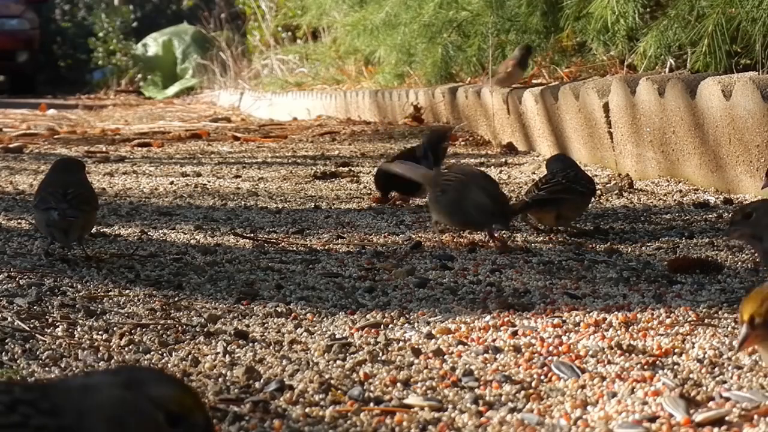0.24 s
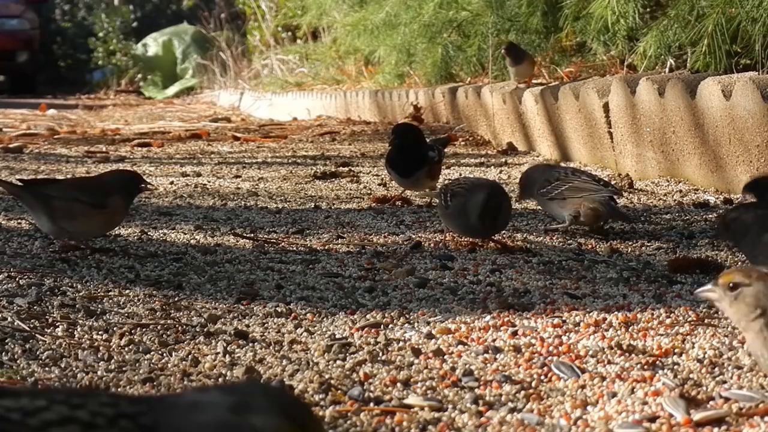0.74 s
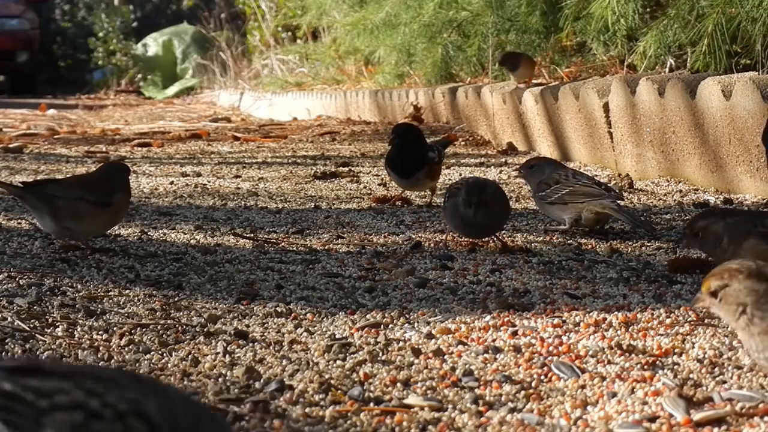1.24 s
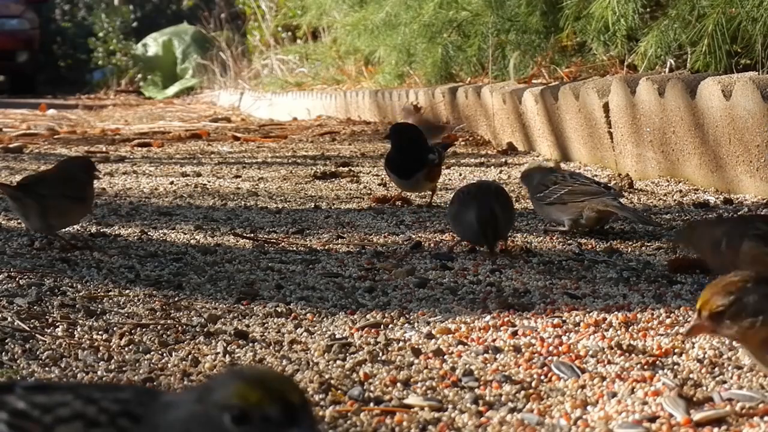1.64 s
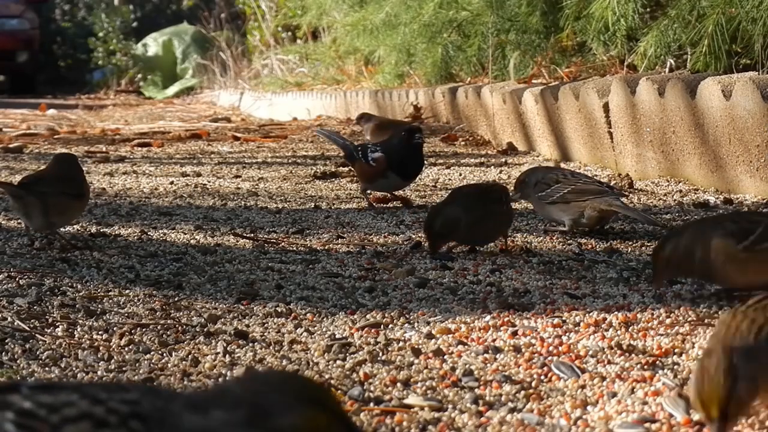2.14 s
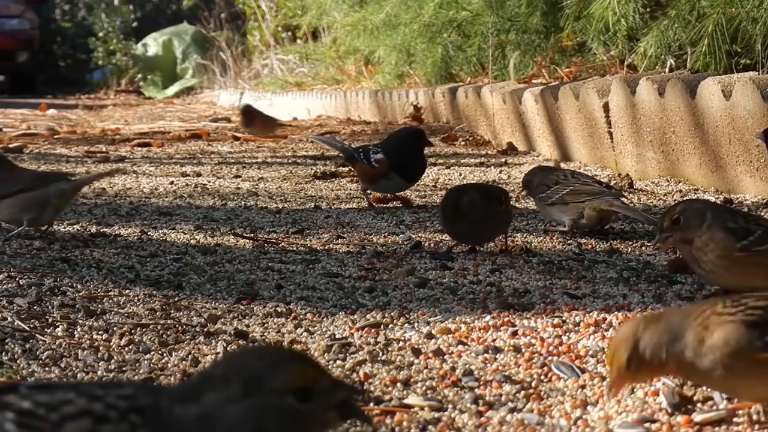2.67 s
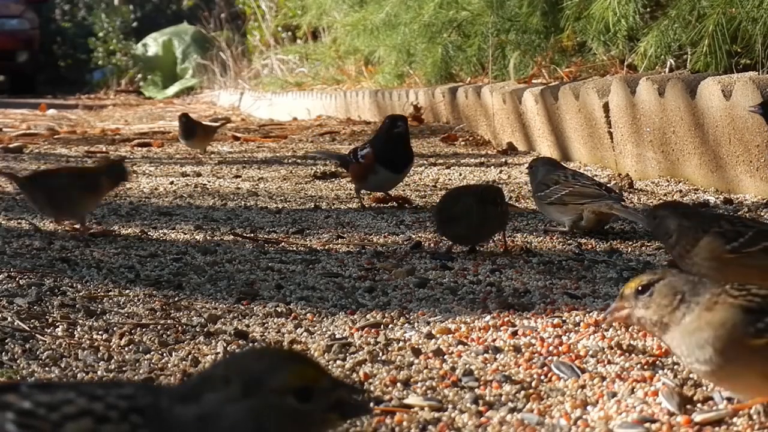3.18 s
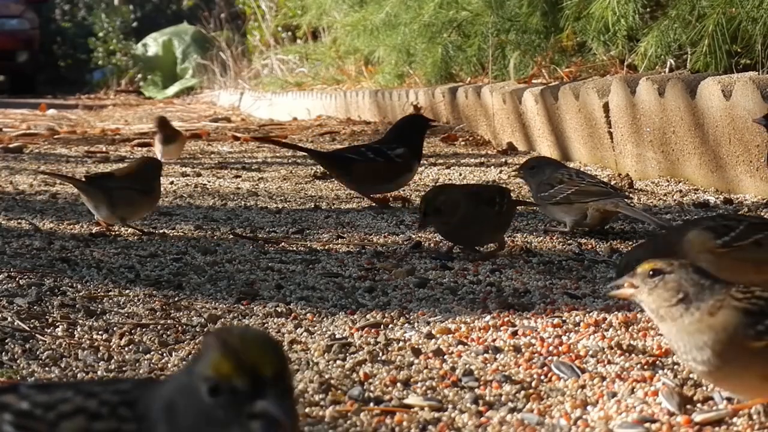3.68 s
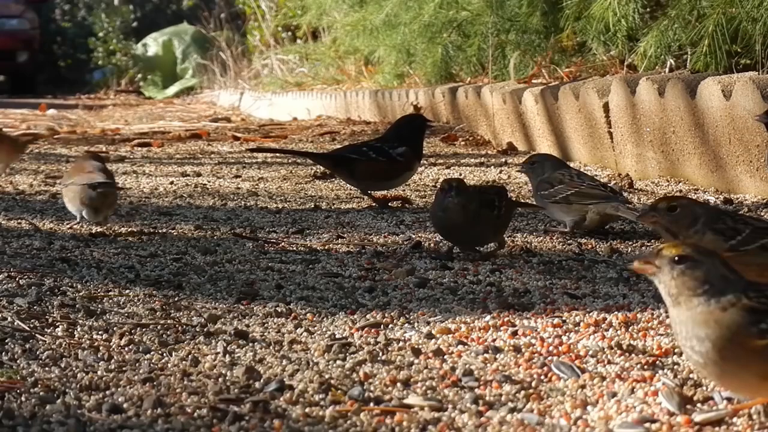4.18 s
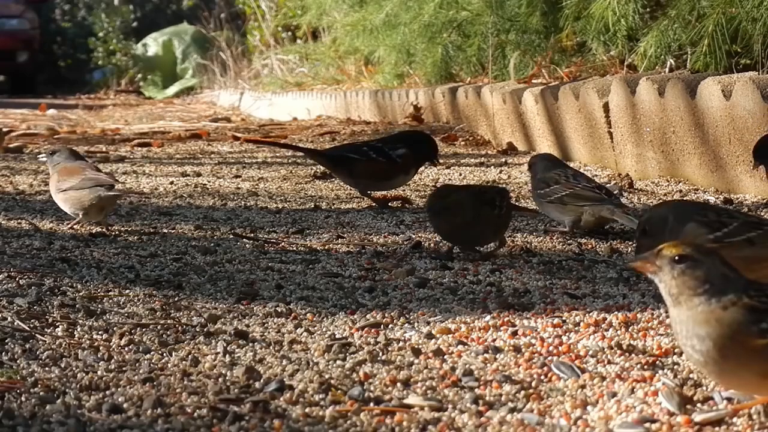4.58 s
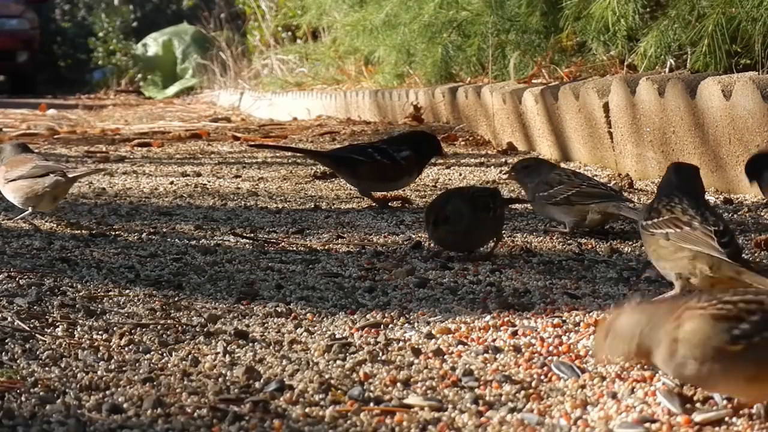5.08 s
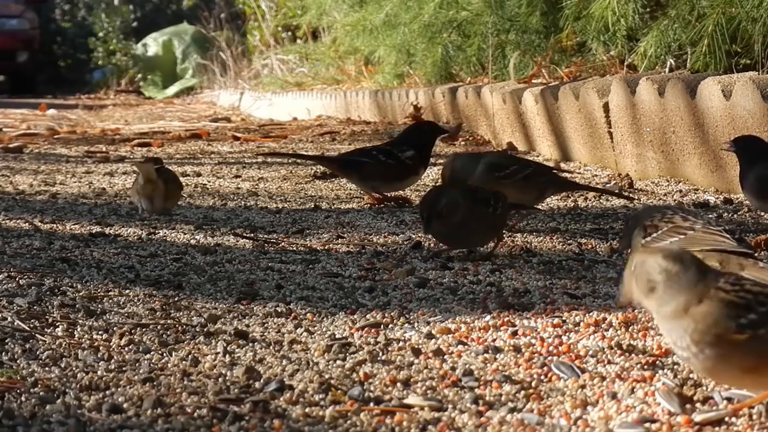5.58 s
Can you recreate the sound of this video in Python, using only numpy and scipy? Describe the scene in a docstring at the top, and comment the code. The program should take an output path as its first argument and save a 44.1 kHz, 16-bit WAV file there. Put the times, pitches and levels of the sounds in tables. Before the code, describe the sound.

Thin, high bird notes fall in quick succession over a quiet outdoor hiss, while nearby small birds tap and crack seeds on gritty ground. The dry little clicks come unevenly, with occasional short chirps and a faint rustle of feet. Past the middle, a cluster of pecks, gravel scuffs and a short flutter stands out as far traffic rises. Everything sounds light and thin, without bass.

```python
"""Sharp little taps and cracks: sparrows feed on seed strewn over gravel, and one flutters briefly.
Each bill impact excites damped modes, a stony click and the snap of a husk, while feet stir the grit.
Thin chirps and a run of falling notes, all frequency-modulated tones, echo in the garden around them,
over a soft hiss and far traffic that swells. The recorder cuts the bass and adds a faint high whine."""
import sys
import numpy as np
from scipy import signal
from scipy.fft import rfft, irfft, next_fast_len
from scipy.io import wavfile
from scipy.ndimage import map_coordinates

SR = 44100
rng = np.random.default_rng(int(sys.argv[2]) if len(sys.argv) > 2 else 0)


def transcribe(u):
    """Save the signal u as a 16-bit wav file named by the first command-line argument.

    u: samples, shape (n,) or (channels, n), limited to [-1, 1]; the rate is SR.
    q: integer samples, one column per channel.
    """
    v = np.clip(np.atleast_2d(u).T, -1, 1)
    q = np.round(v * 32767).astype(np.int16)
    wavfile.write(sys.argv[1], SR, q)


N = 256662
TIME = np.arange(N) / SR

# spectrum of bill on stone: (ratio to click pitch [1], spectral level [dB])
CLICK_SPECTRUM = [(0.402, -26), (.75, -10.5), (1, -2), (1.251, -13), (1.8, -24)]
# spectrum of a cracking husk: (frequency [Hz], spectral level [dB])
HUSK_SPECTRUM = [(3500, -40), (6000, -26), (9000, -10), (10500, -3), (12200, -9), (13300, -2), (14300, 3),
                 (15200, -3), (16000, -12)]
# bill impacts, levels relative within each column: (time [s], knock level [dB], knock pitch [Hz],
# knock decay time T60 [s], click level [dB], click pitch [Hz], husk level [dB])
PECKS = [(0.4105, -41, 3250, .006, -56, 6300, -52), (0.566, -49.5, 2500, 0.0054, -54.5, 6660, -48.5),
         (.582, -51, 2990, 0.0054, -48.5, 5950, -43.5), (0.6458, -30.5, 2500, 0.0061, -49.5, 5570, -31.5),
         (0.6586, -43, 2410, 0.0066, -49.5, 6530, -47), (1.3343, -53, 2580, 0.0074, -53, 6000, -46),
         (1.3399, -51, 2580, 0.0077, -39, 5100, -43.5), (1.4079, -37, 2450, 0.0087, -55, 4800, -49.5),
         (1.4698, -41, 2800, 0.0042, -49, 4600, -47.5), (1.63, -57, 2400, .006, -51.5, 6800, -43),
         (1.9758, -33, 2910, 0.0016, -55.5, 7800, -49), (2.3063, -61, 2500, .005, -60.5, 6600, -55),
         (2.4654, -36.5, 2710, 0.0083, -61, 6600, -41.5), (2.487, -60, 2700, 0.0065, -55, 6750, -57),
         (2.9114, -51, 2600, .004, -55, 6000, -63), (3.208, -49.5, 2500, .005, -54, 6800, -58),
         (3.251, -47.5, 3100, .005, -61, 6000, -63), (3.2818, -39, 2140, .004, -58, 6560, -50),
         (3.3327, -50, 2600, .007, -55.5, 6000, -52.5), (3.404, -37.5, 2640, 0.0046, -47.5, 6900, -51),
         (3.691, -55, 2020, .0058, -52.5, 6600, -46), (3.8242, -29, 2700, 0.0063, -38.5, 6760, -35),
         (3.8459, -42, 2440, 0.0049, -56, 6600, -52), (3.9488, -48, 2560, 0.0051, -53, 6600, -40),
         (3.9719, -44, 2580, 0.0069, -46.5, 5800, -48.5), (4.1106, -45, 2280, .006, -51, 6600, -44),
         (4.132, -49, 2670, .006, -42, 6630, -34.5), (4.2065, -51, 2280, 0.0045, -49, 7840, -48.5),
         (4.228, -53, 2540, 0.0053, -46.5, 5200, -40), (4.2344, -60, 2600, .005, -46.5, 6000, -40.5),
         (4.2424, -57, 2600, .005, -49, 5200, -43), (4.252, -55, 2500, .005, -54, 6000, -41.5),
         (4.291, -47, 1990, 0.01, -48, 5970, -47.5), (4.3477, -54, 2450, .006, -62, 6600, -48.5),
         (4.363, -56, 2500, .006, -55.5, 6200, -46.5), (4.384, -52, 2500, .006, -54, 5600, -47.5),
         (4.424, -59, 2480, .006, -56, 6600, -49), (5.7224, -46, 2050, .008, -38, 8400, -43.5)]
def pecks():
    """Impact and fracture radiate brief transients: a woody knock, a stony click and a husk's crack."""
    out = np.zeros((2, N))
    lead_s, rebound_s = .003, .0015
    t = np.arange(SR // 40) / SR - lead_s
    for s, knock_db, knock_hz, t60, click_db, click_hz, husk_db in PECKS:
        click_spectrum = [(ratio * click_hz, db) for ratio, db in CLICK_SPECTRUM]
        click = amp(click_db - 9) * snap(click_spectrum, t, t60=.009)
        husk = amp(husk_db - 6.5) * snap(HUSK_SPECTRUM, t, t60=.0052)
        wood = panned(amp(knock_db - 11) * knock(knock_hz, t60, t), pan_db=1.5)
        add(out, s - lead_s, wood + panned(click + husk, pan_db=-3.5))
        add(out, s - lead_s + rebound_s, amp(-20.5) * wood)  # the seed hops and lands again
    return out

# modes of a knock: (ratio to knock pitch [1], relative level [dB])
KNOCK_MODES = [(.74, -5.5), (0.901, -2), (1.051, 2), (1.26, -2)]
# passband of a knock: (ratio to knock pitch [1], gain [dB])
KNOCK_BAND = [(.42, -32), (.56, -14), (.68, 0), (1.2, 0), (1.4, -8), (1.65, -26), (2.2, -50)]
def knock(hz, t60, t):
    """Damped free vibration: a few modes ring down over a little crunch from the seed bed."""
    age = np.maximum(t, 0)
    modes = sum(amp(db + rng.standard_normal()) * np.sin(2 * np.pi * hz * ratio * age)
                for ratio, db in KNOCK_MODES)
    envelope = (1 - np.exp(-age / .0003)) * amp(-60 * age / t60)
    band = [(ratio * hz, db) for ratio, db in KNOCK_BAND]
    crunch = amp(-18) * snap(band, t, t60=.014)
    return unit(shaped(modes * envelope, band)) + crunch

# spectrum of swept gravel: (frequency [Hz], spectral level [dB])
GRAVEL_SPECTRUM = [(600, -13.5), (1700, -13), (3500, -3.5), (4700, -4), (6500, -3), (8500, -13),
                   (9600, -4.5), (10700, 0.5), (11900, -4), (13200, -0.5), (14600, -2.5), (16000, -11)]
# foot sweeps: (peak time [s], rise [s], fall [s], level [dB])
SCUFFS = [(.568, 0.017, .018, -50), (1.344, 0.021, 0.049, -53.5), (3.95, .024, 0.075, -52),
          (4.116, .015, .011, -38.5), (4.131, .009, .016, -37), (4.172, 0.025, 0.057, -46),
          (4.24, 0.015, 0.03, -46.5), (4.36, 0.077, 0.12, -56), (5.218, 0.031, 0.07, -56.5),
          (5.379, 0.033, .027, -55)]
def scuffs(roughness):
    """Friction noise: each sweep of a foot stirs up a dense, uneven rattle of grit."""
    return roughness * strokes(SCUFFS) * noise(GRAVEL_SPECTRUM)

# spectrum of a wing's swish: (frequency [Hz], spectral level [dB])
WING_SPECTRUM = [(1000, -18), (1500, -4), (2000, 1.5), (3300, 1), (4000, -3), (4800, -1.5), (6600, 0),
                 (8500, -17), (16000, -31.5)]
# wing strokes: (peak time [s], rise [s], fall [s], level [dB])
WINGBEATS = [(4.117, 0.0057, 0.021, -44.5), (4.234, 0.011, 0.01, -56)]
def wingbeats(roughness):
    """Amplitude-modulated noise: each wing stroke is a short, full swish."""
    return roughness * strokes(WINGBEATS) * noise(WING_SPECTRUM)

# falling notes: (time [s], duration [s], first pitch [Hz], last pitch [Hz], relative level [dB])
FALLS = [(.003, .045, 5860, 3950, -55), (.138, 0.047, 6230, 3480, -51.5), (.281, 0.028, 6030, 3660, -49.5),
         (.404, .024, 6160, 4050, -51), (.519, .033, 5920, 3990, -54), (.625, 0.053, 6260, 3670, -52.5),
         (3.85, 0.042, 5770, 4220, -54.5)]
def falling_notes():
    """Frequency sweep: each note slides down an almost straight line."""
    def contour(u, length, first_hz, last_hz):
        return first_hz + (last_hz - first_hz) * u ** .95
    return whistles(FALLS, contour, depth_hz=50, jitter=.014, flutter_db=2.5)

# held notes: (time [s], duration [s], pitch [Hz], initial pitch offset [Hz], relative level [dB])
HOLDS = [(.259, 0.03, 5820, 98, -55.5), (.365, 0.048, 5790, 1450.5, -55), (.487, 0.036, 6050, 1201, -57.5),
         (.589, .045, 6550, -2.5, -56.5), (3.046, 0.011, 6380, 0.5, -54.5), (3.83, 0.023, 5970, 501.5, -60),
         (3.972, 0.027, 5850, 300, -57.5)]
def held_notes(settle_s=.014):
    """Exponential relaxation: each note settles onto its pitch, and most lead into a fall."""
    def contour(u, length, hz, offset_hz):
        return hz + offset_hz * np.exp(-u * length / settle_s)
    return whistles(HOLDS, contour, depth_hz=40, jitter=.012, flutter_db=3)

# chirps: (time [s], duration [s], top pitch [Hz], relative level [dB])
CHIRPS = [(.231, 0.029, 7350, -56.5), (.55, .032, 7260, -54), (.902, 0.03, 7280, -57),
          (1.094, 0.049, 7810, -48.5), (2.025, 0.028, 8120, -60), (2.702, .021, 7320, -62.5),
          (4.48, 0.071, 7140, -63), (4.752, 0.031, 6580, -61)]
def arched_chirps(peak=.76):
    """Reversing frequency sweep: the pitch climbs, rounds off late in the note and hooks down."""
    def contour(u, length, top_hz):
        climb = .18 * np.abs(1 - u / peak) ** 1.9
        hook = .093 * np.abs((u - peak) / (1 - peak)) ** 3
        return top_hz * (1 - np.where(u < peak, climb, hook))
    return whistles(CHIRPS, contour, depth_hz=20, jitter=.006, flutter_db=1)

# a thin buzzy call: (time [s], duration [s], pitch [Hz], relative level [dB])
BUZZES = [(4.712, 0.07, 9480, -55)]
def buzzy_call():
    """Deep, fast frequency modulation spreads a tone into sidebands, heard as a buzz."""
    return whistles(BUZZES, lambda u, length, hz: hz,
                    depth_hz=620, jitter=.045, flutter_db=2, vibrato_hz=201)

def whistles(notes, contour, depth_hz, jitter, flutter_db, vibrato_hz=180):
    """Frequency and amplitude modulation: each note is one sine, roughened in pitch and level."""
    out = np.zeros(N)
    waver = 1 + jitter * wobble(500)
    for s, length, *pitch, db in notes:
        u = np.linspace(0, 1, int(length * SR))  # progress through the note
        vibrato = depth_hz * np.sin(2 * np.pi * vibrato_hz * length * u)
        hz = contour(u, length, *pitch) * waver[int(s * SR):][:len(u)] + vibrato
        envelope = amp(db + 7.5) * np.abs(np.sin(np.pi * u ** 1.8)) ** .27
        add(out, s, envelope * np.sin(2 * np.pi * np.cumsum(hz) / SR))
    return out * unit(amp(flutter_db * wobble(260)))

def grit_ticks(per_second=70, ring_cycles=14):
    """Random impacts: grains knocked by feet ring as damped sines, each with its own pitch and place."""
    out, t = np.zeros((2, N)), np.arange(SR // 200) / SR
    for when, pitch, size, side in rng.random((int(per_second * N / SR), 4)):
        hz = 7500 * 2 ** (1.8 * (pitch - .5))
        envelope = amp(-56 + 12 * size ** 4 - 60 * t * hz / ring_cycles)
        ring = envelope * np.sin(2 * np.pi * hz * t)
        add(out, when * N / SR, panned(ring, pan_db=10 * (side - .5)))
    return out

# spectrum of the flock's rustle: (frequency [Hz], spectral level [dB])
RUSTLE_SPECTRUM = [(7000, -25), (9500, -10.5), (10800, -2), (12300, -8.5), (13600, -5.5), (16000, -9.5)]
# spells of busier shuffling: (peak time [s], half width [s], level rise [dB])
SPELLS = [(.97, 0.074, 2), (2.079, .2, 5), (3.0, 0.13, 4), (4.22, .17, 5.5), (5.05, 0.33, 5.5)]
def rustle():
    """Incoherent superposition: the flock's small steps and nibbles merge into a thin, grainy noise."""
    busy_db = sum(rise_db * np.exp(-((TIME - s) / width) ** 2) for s, width, rise_db in SPELLS)
    grains = unit(amp(2.5 * wobble(900) + 2 * wobble(25)))
    return panned(amp(-65.5 + busy_db) * grains * noise(RUSTLE_SPECTRUM), pan_db=-1)

# spectrum of far traffic: (frequency [Hz], spectral level [dB])
TRAFFIC_SPECTRUM = [(500, -7.5), (1000, -1.5), (1300, -4), (1850, 1.5), (2400, -2.5), (3300, -14.5),
                    (4200, -19), (6000, -38.5)]
def traffic(far_db=-64, near_db=-50.5, midpoint_s=3.9, approach_s=.55):
    """Level rises as distance shrinks: traffic noise swells once as it draws nearer."""
    nearness = (1 + np.tanh((TIME - midpoint_s) / approach_s)) / 2
    db = far_db + (near_db - far_db) * nearness
    return amp(db + .7 * wobble(10)) * noise(TRAFFIC_SPECTRUM)

# spectrum of the outdoor hiss: (frequency [Hz], spectral level [dB])
HISS_SPECTRUM = [(500, -6), (1000, 1), (1300, -5.5), (1900, 1.5), (2400, -3), (3600, -4), (4200, -6.5),
                 (6400, -9), (8500, -12), (10900, -16), (12400, -16), (14000, -18), (16000, -19)]
def hiss():
    """Ambient noise floor: a broadband hiss whose level barely drifts."""
    return amp(-53.5 + .35 * wobble(1.4)) * noise(HISS_SPECTRUM)

# balance of the background: (frequency [Hz], left minus right level [dB])
BALANCE = [(1300, 2.5), (2400, 1.5), (4400, 1.5), (8000, 0), (14000, -2)]
def background():
    """Interchannel level difference: hiss and traffic lean left, their highest treble right."""
    return filtered(hiss() + traffic(), lambda hz: amp(along(BALANCE, hz) * [[.5], [-.5]]))

def garden(x, t60):
    """Diffuse reverberation: echoes from ground, edging and shrubs decay exponentially."""
    t = np.arange(SR // 2) / SR
    build_up = 1 - np.exp(-t / .0027)
    tail = rng.standard_normal((2, len(t))) * amp(-60 * t / t60) * build_up
    return signal.fftconvolve(np.atleast_2d(x), tail / np.linalg.norm(tail[0]), axes=1)[:, :N]

# likeness of the two channels: (frequency [Hz], correlation [1])
COHERENCE = [(1400, 0.76), (3100, 0.3), (7000, 0.061), (11000, 0.013), (15000, 0.15)]
def noise(spectrum):
    """Partial coherence: coloured stereo noise, most alike in both channels at low frequency."""
    def response(hz):
        angle = np.arccos(along(COHERENCE, hz)) / 2
        return amp(along(spectrum, hz)) * [np.cos(angle), np.sin(angle)]
    mid, side = filtered(rng.standard_normal((2, N)), response)
    return np.array([mid + side, mid - side]) / np.std(mid)

def snap(spectrum, t, t60):
    """Exponential decay: a burst of coloured noise, a little different at each microphone."""
    burst = rng.standard_normal(len(t)) + .5 * rng.standard_normal((2, len(t)))
    return unit(shaped(burst * (t >= 0) * amp(-60 * np.abs(t) / t60), spectrum))

def strokes(rows):
    """Power addition: the joint gain of sweeps that each swell and fall away."""
    return np.sqrt(sum(amp(db) ** 2 * np.exp(-((TIME - s) / np.where(TIME < s, rise, fall)) ** 2)
                       for s, rise, fall, db in rows))

def amp(db):
    """Decibels to amplitude ratio."""
    return 10 ** (np.asarray(db) / 20)

def unit(x):
    """Normalisation to rms 1."""
    return x / np.sqrt(np.mean(x ** 2) + 1e-20)

def along(points, hz):
    """Interpolation of (frequency, value) points on a log axis."""
    f, v = np.transpose(points)
    return np.interp(np.log(hz + 1), np.log(f + 1), v)

def wobble(rate):
    """Smooth random modulation, rate knots a second."""
    return map_coordinates(rng.standard_normal(int(N * rate / SR) + 4), [TIME * rate])

def filtered(x, response):
    """Linear filtering: the spectrum of x times a frequency response."""
    n = x.shape[-1]
    m = next_fast_len(n + min(n, SR // 2))
    return irfft(rfft(x, m) * response(np.fft.rfftfreq(m, 1 / SR)), m)[..., :n]

def shaped(x, spectrum):
    """Spectral shaping by (frequency [Hz], gain [dB]) points."""
    return filtered(x, lambda hz: amp(along(spectrum, hz)))

def panned(x, pan_db):
    """Level difference places a sound; positive is left."""
    return x * amp([[pan_db / 2], [-pan_db / 2]])

def from_right(x, lag_s):
    """Path difference: sound from the right reaches the left microphone later."""
    return filtered(x, lambda hz: np.exp(1j * np.pi * hz * lag_s * np.array([[-1], [1]])))

def add(track, s, x):
    """Superposition of x on the track at time s."""
    i = max(0, round(s * SR))
    track[..., i:i + x.shape[-1]] += x[..., :N - i]

def scene():
    """Direct and reflected sound: near pecks stay almost dry; calls scatter and leave a duller echo."""
    feeding = from_right(pecks(), lag_s=28e-6)
    roughness = unit(amp(2 * np.tanh(wobble(1400)) + 2 * np.tanh(2 * wobble(220))))
    feeding += scuffs(roughness) + wingbeats(roughness)
    falls, holds, chirps, buzz = falling_notes(), held_notes(), arched_chirps(), buzzy_call()
    calls = falls + holds + buzz + chirps
    far_calls = holds + buzz + amp(-3) * falls + amp(-6) * chirps
    near = feeding + amp(-13) * garden(feeding, t60=.018)
    early = amp(-4.3) * calls + amp(-8.5) * garden(calls, t60=.011)  # direct, and off the ground
    scatter = amp(-7) * garden(far_calls, t60=.13)  # through the shrubs
    late = shaped(garden(far_calls, t60=.52), [(4500, -5), (6200, -3.5), (8000, -16.5)])
    return near + early + scatter + late + rustle() + grit_ticks() + background()

# resonances of the microphone housing: (frequency [Hz], bandwidth [Hz], gain [dB])
HOUSING_MODES = [(2480, 96, 1.5), (2920, 120, 1.5), (4670, 120, 2.5), (5960, 34, 2.5), (6860, 48, 4.5),
                 (10520, 88, 4), (10670, 50, 5), (11500, 57, 3), (11000, 79, 3), (11700, 64, 4),
                 (12800, 88, 3), (13100, 170, 3)]
def housing(hz):
    """Resonance: the housing lifts a few narrow bands."""
    return amp(sum(db / (1 + (2 * (hz - centre) / width) ** 2) for centre, width, db in HOUSING_MODES))

def record(dry):
    """Band limiting: the recorder colours the sound, cuts bass and top steeply and adds a whine."""
    low_cut_hz, whine_hz, top_hz = 1561, 14835, 15850
    whine = amp(-58.6 + .6 * wobble(3)) * np.sqrt(2) * np.sin(2 * np.pi * whine_hz * TIME)
    bass_cut = signal.butter(7, low_cut_hz, "highpass", fs=SR, output="sos")
    coloured = filtered(from_right(dry, lag_s=30e-6), housing)
    thinned = signal.sosfilt(bass_cut, coloured)
    return filtered(thinned + panned(whine, pan_db=-6.5), lambda hz: hz < top_hz)

dry = scene()
out = record(dry)
transcribe(out)
```